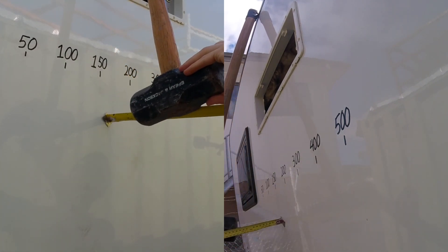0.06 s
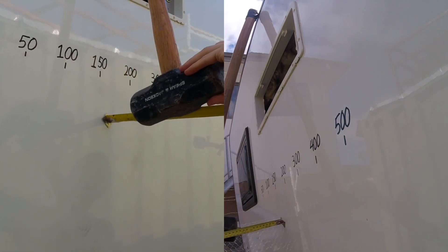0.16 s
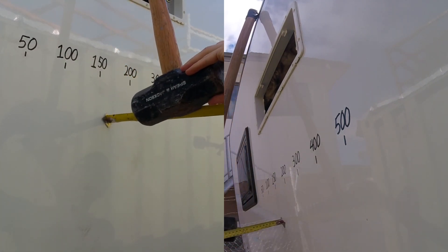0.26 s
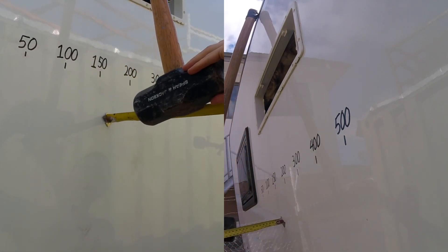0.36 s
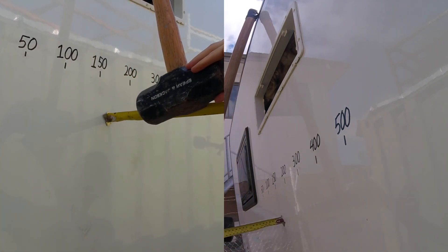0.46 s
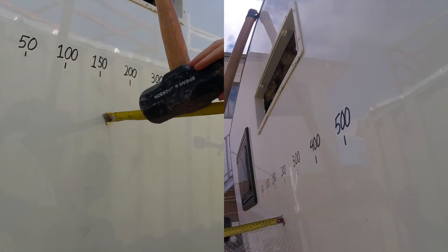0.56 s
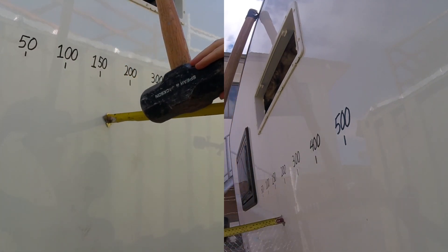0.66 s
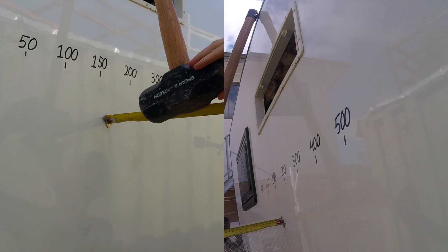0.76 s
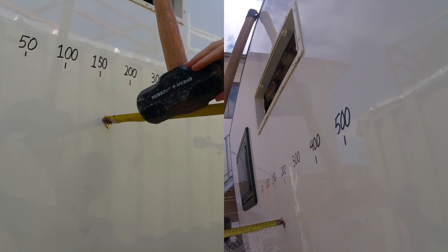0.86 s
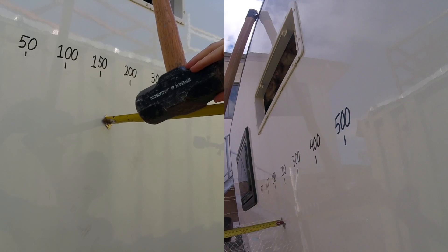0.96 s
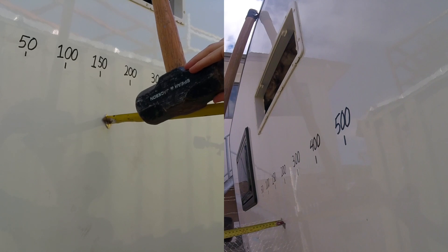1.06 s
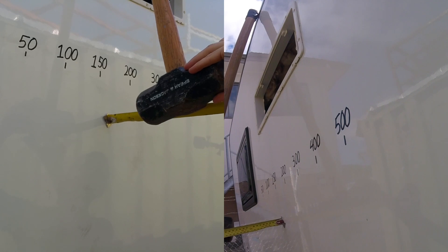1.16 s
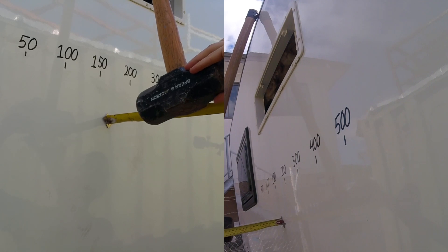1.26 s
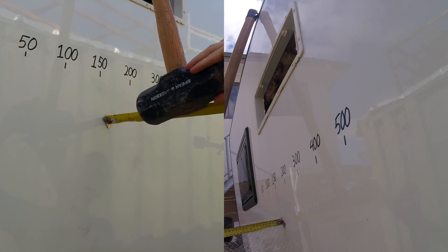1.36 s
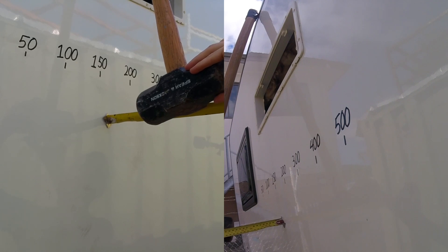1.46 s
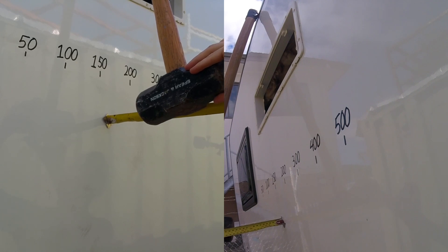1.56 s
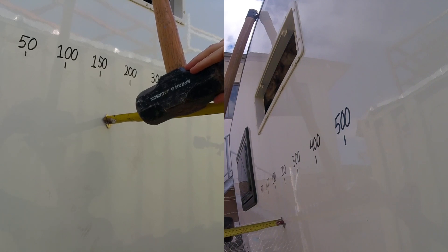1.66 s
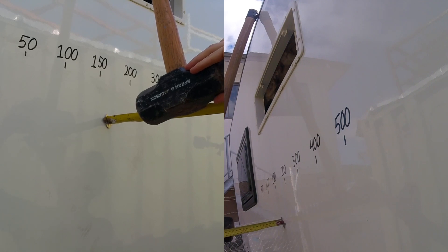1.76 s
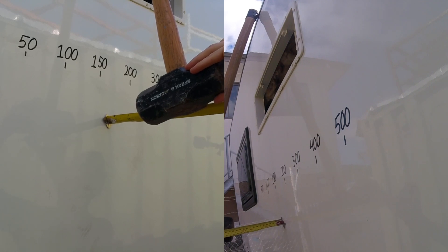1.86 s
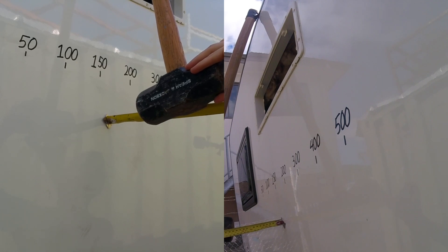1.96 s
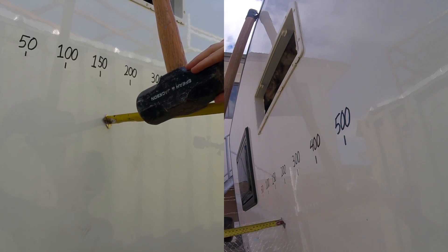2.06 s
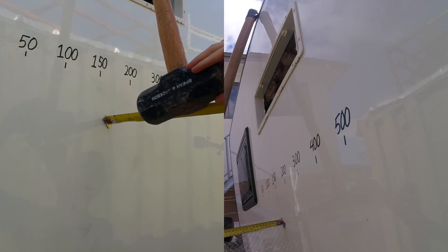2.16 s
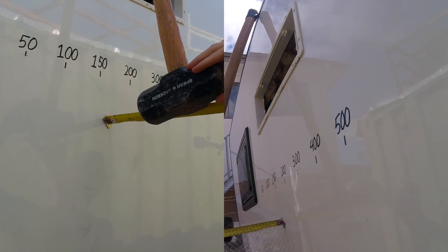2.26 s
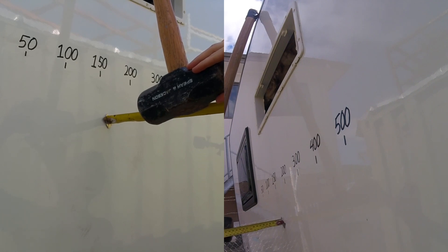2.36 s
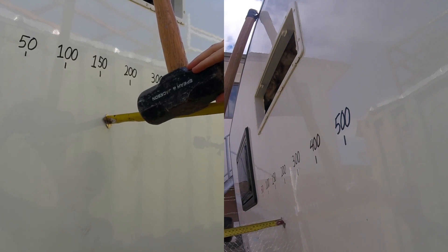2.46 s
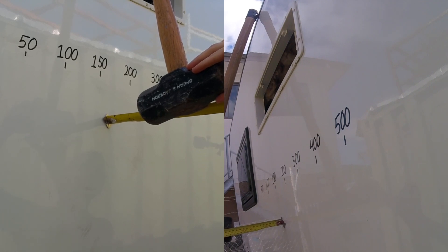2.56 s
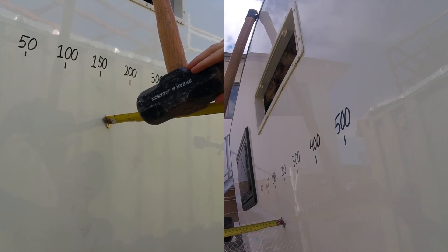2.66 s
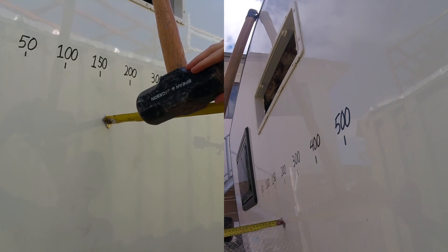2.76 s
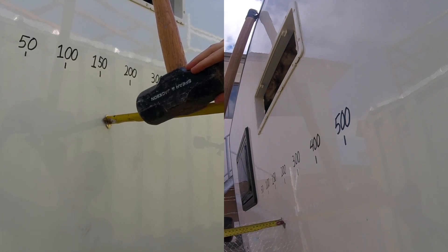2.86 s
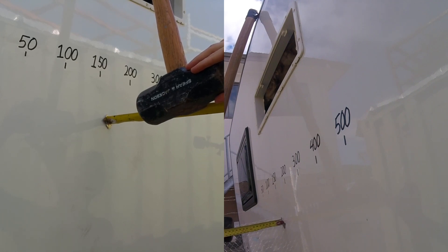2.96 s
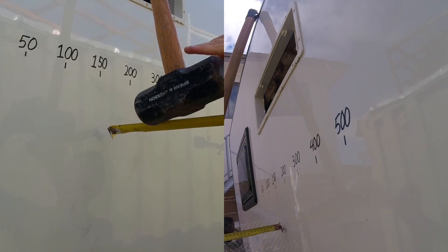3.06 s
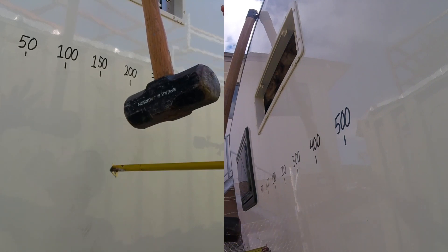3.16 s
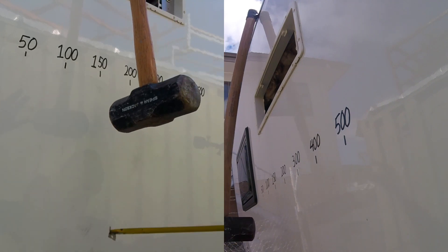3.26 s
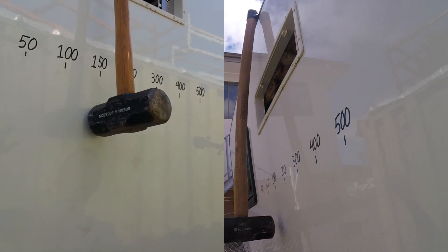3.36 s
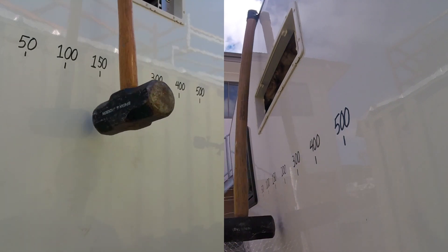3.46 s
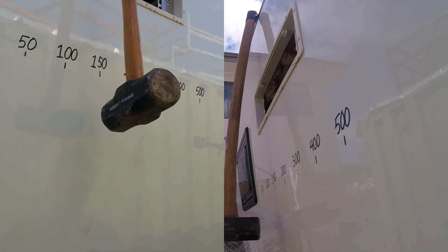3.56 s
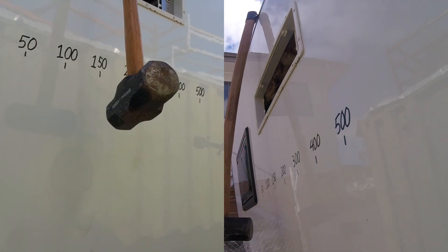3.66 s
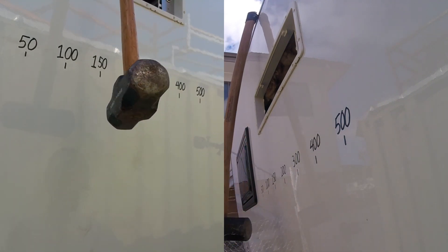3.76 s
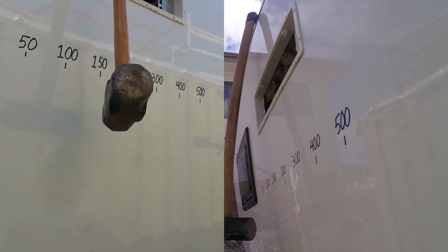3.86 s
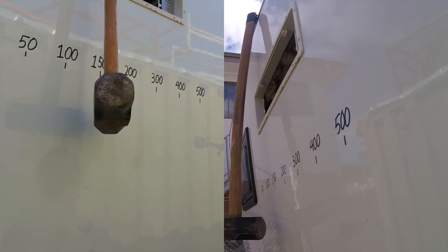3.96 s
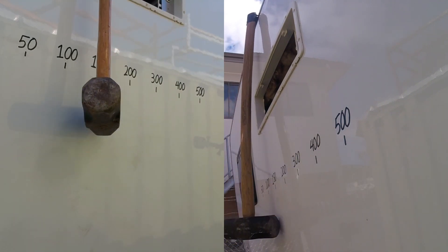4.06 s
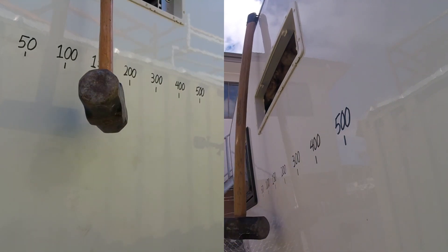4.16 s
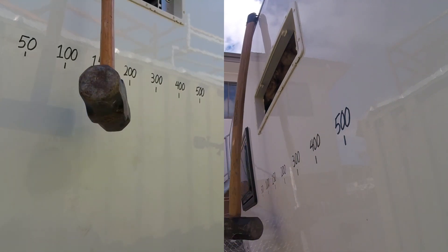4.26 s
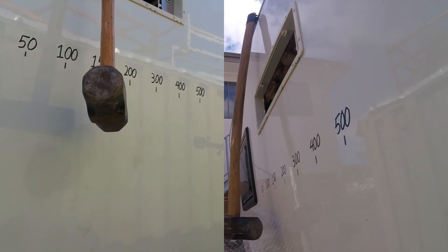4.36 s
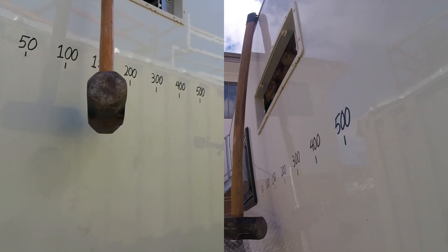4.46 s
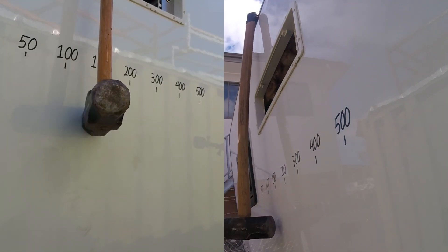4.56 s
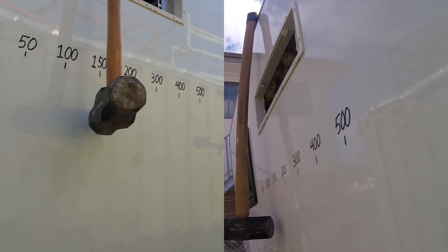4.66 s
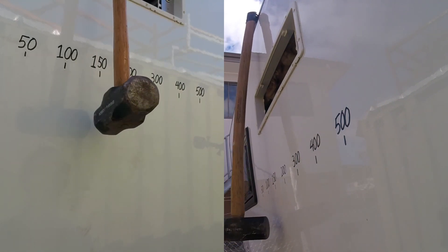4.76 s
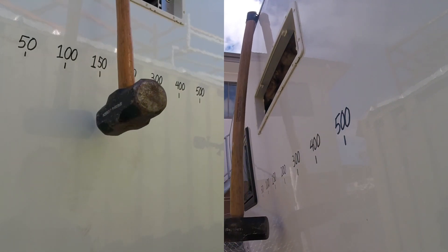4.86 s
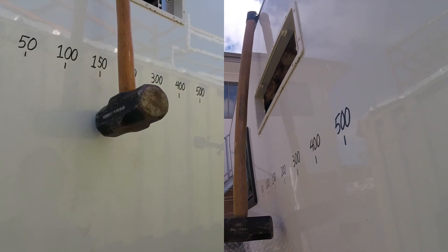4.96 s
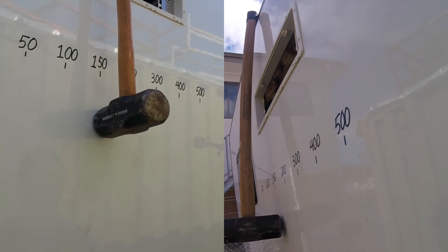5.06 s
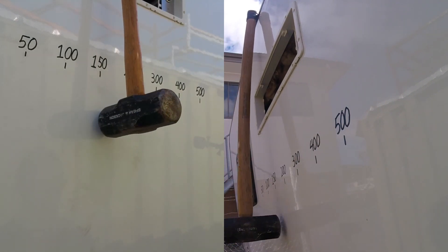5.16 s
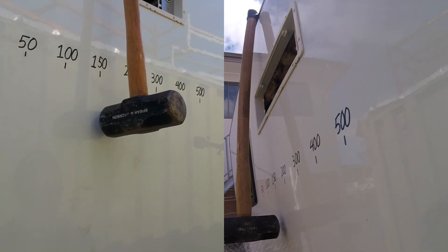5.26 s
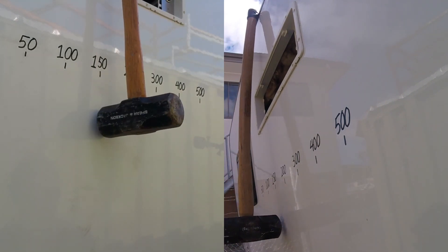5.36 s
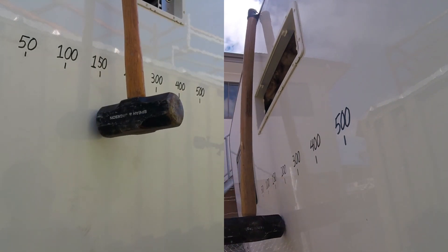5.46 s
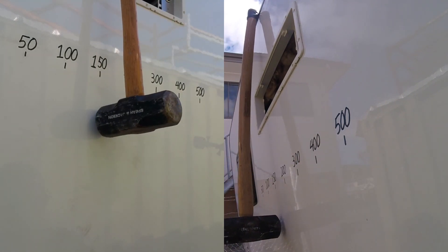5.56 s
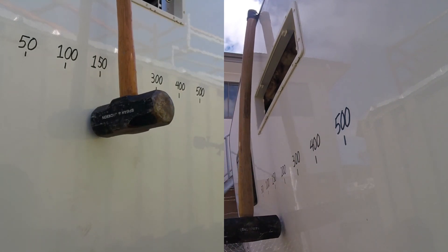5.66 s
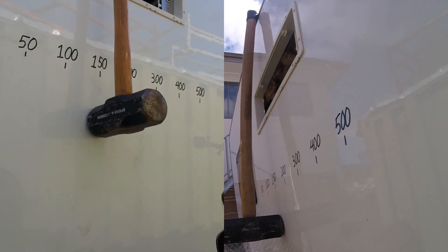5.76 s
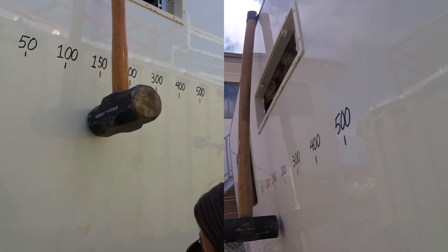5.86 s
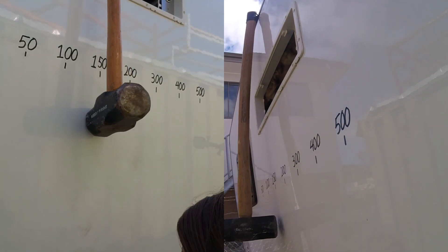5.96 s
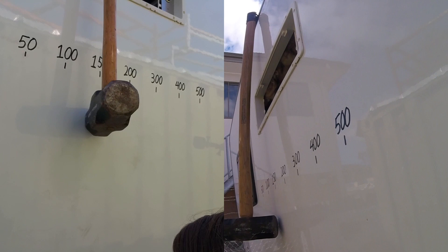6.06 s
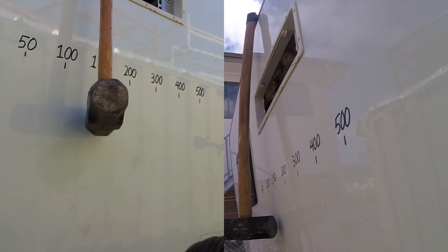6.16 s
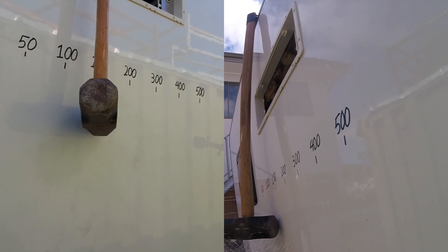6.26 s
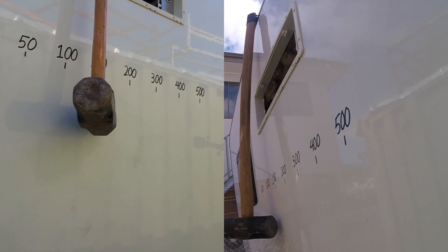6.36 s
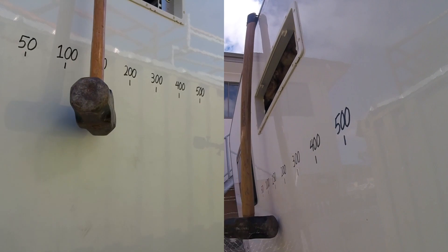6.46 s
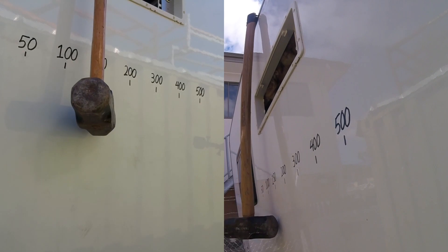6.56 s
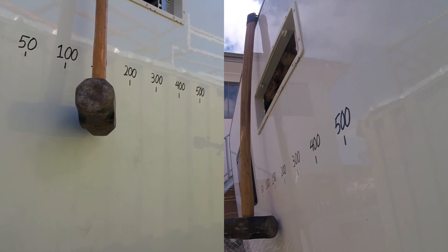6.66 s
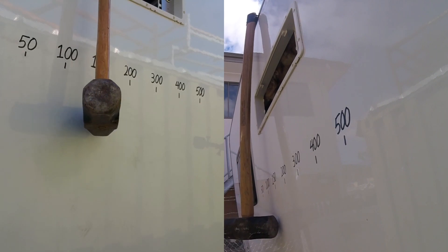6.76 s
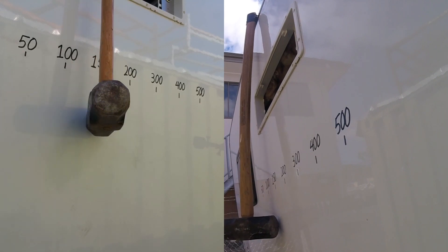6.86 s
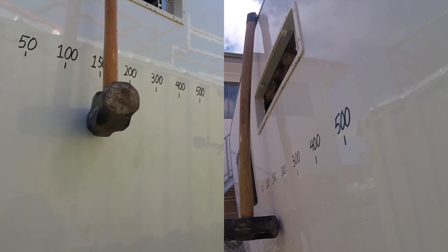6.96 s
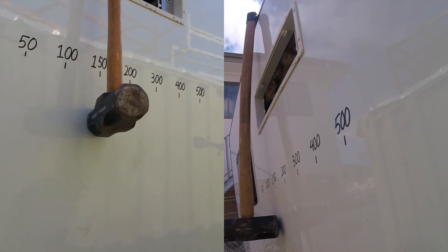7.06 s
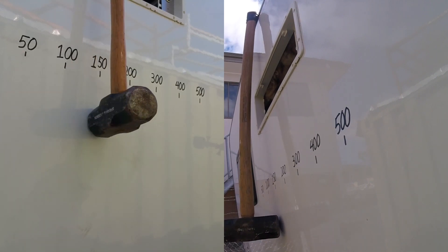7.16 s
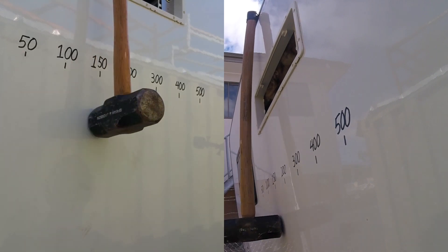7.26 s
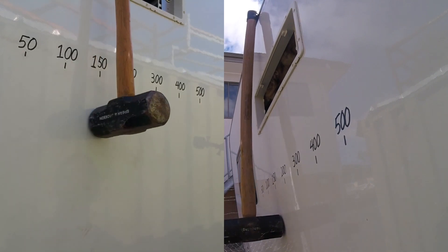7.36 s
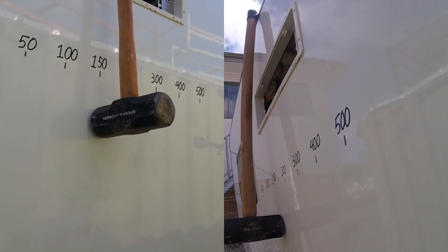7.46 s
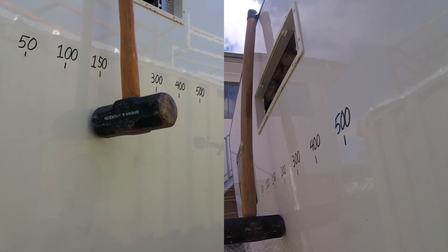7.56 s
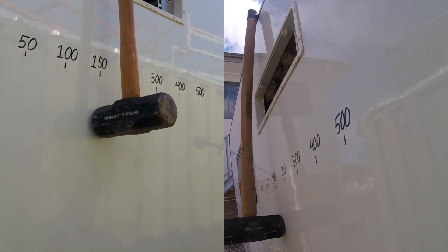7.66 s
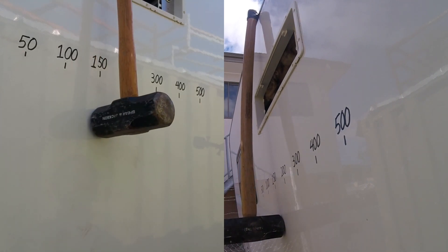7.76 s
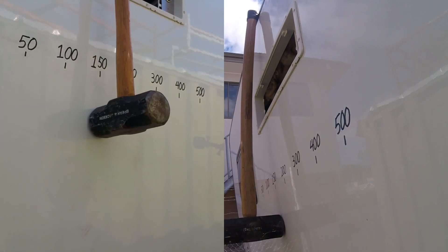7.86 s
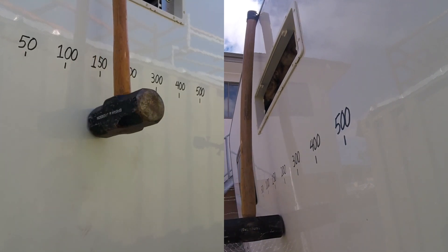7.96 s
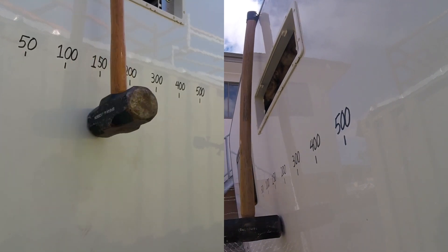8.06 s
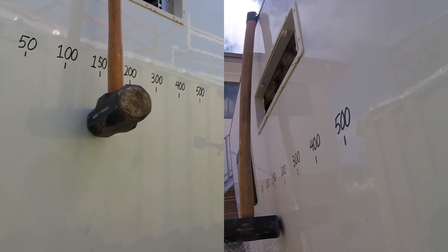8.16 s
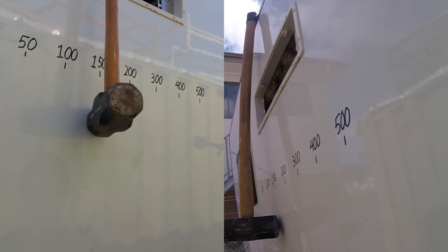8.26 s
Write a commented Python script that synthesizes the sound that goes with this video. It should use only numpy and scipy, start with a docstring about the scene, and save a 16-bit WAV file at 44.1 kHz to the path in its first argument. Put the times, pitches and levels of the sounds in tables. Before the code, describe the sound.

Outdoors, a quiet distant machine hum and soft rumble. After a few seconds a hanging sledgehammer slams a hollow fibreglass wall with a hard crack, deep boom and rattling fittings. It bounces back in duller knocks, ever closer together and mostly softer, ending in a tiny flutter. Close to the microphone, a metal tape measure squeaks faintly, clicks and scrapes back into its case.

```python
"""A hanging sledgehammer swings into a caravan's fibreglass wall and bounces, faster and broadly softer.
Each blow sums ringing bending modes with filtered noise for the shell; the first also drives the frame.
Close to the microphone, as of a tape measure being put away: thin squeaking tones, short ringing clicks,
and a rustle of noise grains over hiss.
In the distance outdoors a machine hums in wavering harmonics, over low rumble and a wash of air, both noise."""
import sys
import numpy as np
from scipy import signal
from scipy.fft import rfft, irfft
from scipy.io import wavfile

SR = 44100
rng = np.random.default_rng(int(sys.argv[2]) if len(sys.argv) > 2 else 0)


def materialize(psi):
    """Save the field psi as 16-bit PCM at rate SR to the path in sys.argv[1].

    A 1-D psi becomes a single channel; in a 2-D psi each row is a channel.
    """
    bounded = np.clip(np.atleast_2d(psi).T, -1, 1)
    quanta = np.round(bounded * 32767).astype(np.int16)
    wavfile.write(sys.argv[1], SR, quanta)


N = 366471
TIME = np.arange(N) / SR
RING = np.arange(int(0.7 * SR)) / SR  # time axis of one struck sound, s

# Levels in the tables are relative: each source sets its own gain. Spectra give shape only.
# Distant outdoors, wash of air and low rumble: f/Hz, level/dB per Hz
AIR_SPECTRUM = [(100, -18.5), (300, -1), (480, 1.5), (630, -2.5), (1000, -6), (1700, -13.5), (2400, -16.5),
                (3200, -23), (4000, -25), (5000, -33), (6300, -38.5), (9000, -57.5), (12500, -44.5),
                (15500, -48.5)]
RUMBLE_SPECTRUM = [(20, -53.5), (35, -31), (55, -7.5), (90, 5), (140, 7), (185, 2.5), (230, 5), (275, -5),
                   (330, 0), (420, -12.5), (550, -53)]
# Distant machine, harmonics of its hum: multiple of the fundamental, level/dB
HUM_HARMONICS = [(1, -38.5), (2, -50), (3, -62)]
HUM_HZ = 196.35  # mean fundamental
AIR_DB, RUMBLE_DB, BACKGROUND_DB = -46.5, -41.5, 0.4  # the last is added to the whole background
DIP_S, DIP_DB, DIP_FALL_S, DIP_RECOVER_S = 4.074, -4, 0.22, 1  # the background dips once, returns slowly

# Close by, short rubs of the blade as it is handled: start t/s, length t/s, scrape level/dB, hiss level/dB
BLADE_RUBS = [(0.072, 0.076, -58, -69), (.225, 0.064, -57, -76), (3.832, .045, -55, -73),
              (3.883, 0.076, -54, -68), (3.979, .1, -49, -74), (5.48, 0.1, -45.5, -78),
              (5.642, 0.09, -51, -75), (7.299, 0.03, -54, -64), (8.092, 0.076, -53.5, -71)]
# Close by, the blade runs back into its case: t/s, scrape level/dB, hiss level/dB
BLADE_RUN_IN = [(7.27, -63, -80), (7.304, -51, -74), (7.404, -40, -71.5), (7.57, -45.5, -67),
                (7.616, -39.5, -73), (7.63, -49, -66), (7.88, -56.5, -78)]
# Sliding blade, catching grains and smooth hiss: f/Hz, level/dB per Hz
SCRAPE_SPECTRUM = [(300, -17), (800, 7), (1350, 12.5), (2100, 4.5), (3200, 4.5), (4300, -4.5), (6200, -19),
                   (8000, -26), (16000, -29)]
HISS_SPECTRUM = [(2000, -15), (6000, 10), (9000, -9), (12500, 2.5), (15500, -2.5)]
RUN_SCRAPE_DB, RUN_HISS_DB = -3, 6  # added to the run's levels
RUN_EDGE_S = 0.05  # the run starts and stops gently
RUB_SKEW = 0.68  # each rub is one arch; under 1 it swells faster than it eases off
GRAINS_PER_S = 2600  # mean rate

# Close by, thin squeaks, each a little higher: start t/s, length t/s, mean pitch f/Hz, level/dB
SQUEAK_TONES = [(5.387, 0.1, 2206, -48), (5.481, 0.076, 2240, -49), (5.64, 0.069, 2255, -52.5)]
SQUEAK_EDGE_S = 0.022  # rise and fall

# Close by, light clicks of the tape case: t/s, level/dB, ring f/Hz
CASE_CLICKS = [(3.844, -49, 2620), (4.038, -42, 1500), (5.6862, -36, 2680), (5.690, -32, 1070),
               (5.7258, -27, 1300), (5.945, -43.5, 2780), (7.309, -40.5, 1480), (7.3525, -38.5, 2430),
               (7.386, -37, 1700), (7.394, -28, 1420), (7.4489, -32, 1380), (7.4863, -32, 1210),
               (7.5427, -35.5, 1180), (7.5881, -33.5, 1330), (7.6108, -29, 1400), (8.1047, -43, 2910)]
CLICK_EDGE_DB = -74  # the bright edge, alike for all clicks

# At the wall, loose fittings knock after the hardest blow: t/s, level/dB
FITTING_KNOCKS = [(3.525, -21), (3.5489, -17), (3.557, -20.5), (3.574, -21.5), (3.592, -28), (3.622, -27)]
# Loose fittings, colour of a knock: f/Hz, level/dB per Hz
KNOCK_SPECTRUM = [(60, -12), (170, 21), (250, 11), (350, 12), (520, 8.5), (720, 1), (1500, -9), (3000, -19),
                  (4200, -25), (5800, -29.5), (9000, -51), (12000, -43), (16000, -53)]

# Behind the skin, frame modes reached only by the hardest blow: f/Hz, level/dB, 60 dB decay t/s
FRAME_MODES = [(149, -10, 0.11), (181, -11.5, 0.2), (323.6, -13, 0.1)]

# Caravan shell, its crowd of higher modes: f/Hz, level/dB per Hz
SHELL_SPECTRUM = [(40, -20.5), (150, -10.5), (400, 7), (750, 6), (1000, 1), (1400, -3), (2200, -7),
                  (3200, -19), (4200, -25.5), (6000, -30.5), (9000, -53.5), (16000, -68)]
# Caravan shell, decay by band: f/Hz, 60 dB decay t/s
SHELL_DECAY = [(100, 0.97), (500, 0.36), (1500, 0.26), (3000, 0.26), (6000, 0.28), (12000, .19)]

# Hammer on the wall, one row a blow: t/s, strength level/dB, contact hardness/dB per octave
HAMMER_BLOWS = [(3.5179, 2.5, -1.2), (4.1749, -0.5, 0.5), (4.7078, -2.5, 1.5), (5.1895, -3, 1.5),
                (5.5528, -5.5, 0.5), (5.8691, -5.5, -2), (6.149, -10.5, -1.5), (6.3791, -11.5, 0.2),
                (6.5571, -12, -0.3), (6.698, -15, -1), (6.826, -16.5, -1.5), (6.944, -17.5, 0),
                (7.064, -16, -4), (7.192, -16.5, -8.5), (7.289, -19, -3), (7.383, -23, 2), (7.460, -24, 4),
                (7.531, -19.5, -11)]
# Wall skin at rest, bending modes in order: f/Hz, level/dB, 60 dB decay t/s
WALL_MODES = [(54.5, -37, 0.81), (74.6, -26.5, 0.63), (102.2, -12, 0.25), (121, -5, 0.12), (147, -10, 0.04),
              (167.8, -22, 0.41), (200.4, -16.5, 0.35), (234, -21.5, 0.24), (248.3, -16.5, 0.11),
              (303.5, -24, 0.27), (345, -26, 0.37), (371.2, -28, 0.22), (398, -28, 0.2), (414, -16, 0.049),
              (475, -45.5, 0.72), (496, -22, 0.27), (530, -27, 0.3), (536, -37, 0.38), (565, -21, 0.1),
              (621, -29.5, 0.3), (640, -32, 0.27), (677.4, -24.5, 0.17), (717, -26, 0.066),
              (792, -34.5, 0.21), (856, -24.5, 0.041), (959, -29, 0.13), (1014, -27.5, 0.055),
              (1087, -40, 0.27), (1200, -44.5, 0.16), (1387, -48.5, 0.27), (2010, -50.5, .22)]
# Tick of first contact (also the click edge), then sizzle of the gelcoat: f/Hz, level/dB per Hz
TICK_SPECTRUM = [(300, -22.5), (2000, 20), (4000, -52), (5600, 10), (7500, 3.5), (9500, -9), (12000, 3.5),
                 (16000, -15)]
SIZZLE_SPECTRUM = [(1000, -10.5), (3000, -2.5), (4300, -10), (5500, 2), (6400, -12), (7500, -18),
                   (9300, -29), (12500, -18), (16000, -27)]
# A dented skin rises in pitch: nearly the initial share at a 0 dB blow, and its growth with force
STRETCH, STRETCH_POWER = 0.0577, 4.66
TICK_DB, TICK_POWER = -50, 9.4  # the steel tick grows steeply: base level at a 0 dB blow, power of force
SIZZLE_DB, SIZZLE_FROM_DB = -37.5, -8.5  # the gelcoat sizzles with the force in excess of a threshold

EDGE_HZ = 15900  # upper band limit


def amp(db):
    """Decibels to gain."""
    return 10 ** (np.asarray(db) / 20)


def unit(x):
    """Scales to rms 1."""
    return x / np.sqrt(np.mean(x ** 2) + 1e-20)


def read(points, hz):
    """Reads a spectrum table on a log-frequency axis."""
    f, value = np.transpose(points)
    return np.interp(np.log(hz + 1), np.log(f + 1), value)


def add(mix, s, sound):
    """Mixes a sound in at time s, cut at the end of the mix."""
    part = mix[round(s * SR):][:len(sound)]
    part += sound[:len(part)]


def colour(x, points):
    """Filters x with a spectrum table, at rms 1."""
    gain = amp(read(points, np.fft.rfftfreq(len(x), 1 / SR)))
    return unit(irfft(rfft(x) * gain, len(x)))


def noise(points, size):
    """Coloured noise of rms 1."""
    return colour(rng.standard_normal(size), points)


def drift(hz):
    """Slow chance of rms 1, mostly below hz changes a second."""
    lowpass = 1 + (np.fft.rfftfreq(N, 1 / SR) / hz) ** 4
    return unit(irfft(rfft(rng.standard_normal(N)) / lowpass, N))


def fade(t60):
    """A decay of 60 dB in t60 seconds."""
    return amp(-60 * RING / np.maximum(t60, 1e-4))


def swell(rise_s):
    """A soft start."""
    return 1 - np.exp(-(RING / rise_s) ** 2)


def gate(start, end, edge_s):
    """Rises, holds and falls between two times."""
    return np.clip(np.minimum(TIME - start, end - TIME) / edge_s, 0, 1)


def outdoors():
    """A distant machine's hum wavers in pitch and level over low rumble and a wash of air."""
    turns = np.cumsum(HUM_HZ * (1 + 0.0027 * drift(11.0))) / SR
    hum = np.zeros(N)
    for multiple, db in HUM_HARMONICS:
        tone = np.sqrt(2) * np.sin(2 * np.pi * round(multiple) * turns)
        hum += amp(db + 1.27 * drift(2.9)) * tone
    rumble = amp(RUMBLE_DB + 1.0 * drift(5.5)) * noise(RUMBLE_SPECTRUM, N)
    air = amp(AIR_DB + 0.19 * drift(7.5)) * noise(AIR_SPECTRUM, N)
    dip = np.interp(TIME, [DIP_S - DIP_FALL_S, DIP_S, DIP_S + DIP_RECOVER_S], [0, 1, 0])
    return amp(BACKGROUND_DB + DIP_DB * dip) * (hum + rumble + air)


def tape():
    """The sliding blade catches in tiny clumped grains over a smooth hiss: short rubs and one long run."""
    s, run_scrape_db, run_hiss_db = np.transpose(BLADE_RUN_IN)
    running = gate(s[0], s[-1], RUN_EDGE_S)
    scrape_level = running * amp(RUN_SCRAPE_DB + np.interp(TIME, s, run_scrape_db))
    hiss_level = running * amp(RUN_HISS_DB + np.interp(TIME, s, run_hiss_db))
    for start, length, scrape_db, hiss_db in BLADE_RUBS:
        stroke = np.sin(np.pi * np.minimum(RING / length, 1) ** RUB_SKEW)
        add(scrape_level, start, amp(scrape_db) * stroke)
        add(hiss_level, start, amp(hiss_db) * stroke)
    catches = rng.random(N) < GRAINS_PER_S / SR
    grains = catches * rng.standard_normal(N) * amp(2 * np.minimum(rng.exponential(1, N), 4))
    scrape = colour(grains * amp(1.7 * drift(90)), SCRAPE_SPECTRUM)  # drift clumps the grains
    hiss = amp(1.2 * drift(60)) * noise(HISS_SPECTRUM, N)
    return scrape_level * scrape + hiss_level * hiss


def squeak():
    """Nearly pure tones that falter in pitch and level as they go."""
    out = np.zeros(N)
    clock = np.cumsum(1 + 0.0032 * drift(70)) / SR
    for s, length, hz, db in SQUEAK_TONES:
        tone = np.sqrt(2) * np.sin(2 * np.pi * hz * clock)
        out += amp(db) * gate(s, s + length, SQUEAK_EDGE_S) * tone
    return out * amp(1.5 * drift(50))


def clicks():
    """Each click is two short plastic resonances, a bright edge and a short scatter off the wall."""
    out = np.zeros(N)
    for s, db, hz in CASE_CLICKS:
        high = np.sin(2 * np.pi * hz * RING) * fade(0.0078)
        low = np.sin(2 * np.pi * 0.59 * hz * RING) * fade(0.028)
        ring = high - amp(-13.5) * low
        around_ring = [(hz / 4, -24), (hz * 0.65, -4), (hz, 0), (hz * 1.6, -9), (hz * 3.5, -30), (hz * 8, -60)]
        scatter = noise(around_ring, len(RING)) * fade(0.077)
        edge = amp(CLICK_EDGE_DB) * noise(TICK_SPECTRUM, len(RING)) * fade(0.06)
        click = amp(db) * (amp(13.0) * ring + amp(-7.5) * scatter) + edge
        add(out, s, click * swell(0.00082))
    return out


def fittings():
    """Loose trim on the shaken wall knocks in short bursts of coloured noise."""
    out = np.zeros(N)
    for s, db in FITTING_KNOCKS:
        knock = noise(KNOCK_SPECTRUM, len(RING)) * fade(0.14) * swell(0.00081)
        add(out, s, amp(db + 2.5) * knock)
    return out


def frame():
    """The first blow dents the skin deep enough to drive the studs behind it, which ring in a few modes."""
    out = np.zeros(N)
    ring = np.zeros(len(RING))
    for k, (hz, db, t60) in enumerate(FRAME_MODES):
        ring += (-1) ** k * amp(db) * fade(t60) * np.sin(2 * np.pi * hz * RING)
    add(out, 3.5225, ring * swell(0.0014))
    return out


def slap(delay_s):
    """A short reflection of the blow's crack off the ground, as a delayed noise burst."""
    burst = noise(SHELL_SPECTRUM, len(RING)) * fade(0.025) * swell(0.00053)
    return np.interp(RING - delay_s, RING, burst, left=0)


def shell(rise_s):
    """Dense modes build up as the wave spreads, and each band dies at its own speed."""
    hz, t, bands = signal.stft(noise(SHELL_SPECTRUM, len(RING)), SR, nperseg=256)
    bands = bands * amp(-60 * t / read(SHELL_DECAY, hz)[:, None])
    bands = bands * amp(1.8 * rng.standard_normal(len(t)))  # the shaken shell rattles unevenly
    ringing = signal.istft(bands, SR, nperseg=256)[1][:len(RING)]
    return ringing * (1 - np.exp(-RING / rise_s))


def contact(x, hardness_db, corner_hz):
    """A softer, longer contact tilts the treble down, without ringing ahead of the blow."""
    size = 65536
    hz = abs(np.fft.fftfreq(size, 1 / SR))
    log_gain = np.log(amp(hardness_db * np.log2(np.hypot(1, hz / corner_hz))))
    minimum_phase = np.exp(np.conj(signal.hilbert(log_gain)))
    return np.fft.ifft(np.fft.fft(x, size) * minimum_phase).real[:len(x)]


def hammer():
    """Blows on one spot: neighbouring modes push the air in opposite senses, so the boom swells late."""
    modes = [((-1) ** k * amp(db) * fade(t60), hz) for k, (hz, db, t60) in enumerate(WALL_MODES)]
    out = np.zeros(N)
    for s, strength_db, hardness_db in HAMMER_BLOWS:
        force = amp(strength_db)
        stretch = STRETCH * force ** STRETCH_POWER
        tick = amp(TICK_DB) * force ** TICK_POWER
        sizzle = amp(SIZZLE_DB) * max(force - amp(SIZZLE_FROM_DB), 0)
        # the dented skin is tauter until it springs back
        clock = RING + stretch * 0.0217 * (1 - np.exp(-RING / 0.022))
        panel = sum(level * np.sin(2 * np.pi * hz * clock) for level, hz in modes)
        body = panel + amp(-26.5) * shell(rise_s=0.0051) + amp(-21.5) * slap(delay_s=0.007)
        add(out, s, force * contact(body, hardness_db, corner_hz=298))
        add(out, s, tick * amp(4.5) * noise(TICK_SPECTRUM, len(RING)) * fade(0.014))
        # the steel face chatters once
        add(out, s + 0.0029, tick * amp(-2.0) * noise(SIZZLE_SPECTRUM, len(RING)) * fade(0.0071))
        add(out, s, sizzle * noise(SIZZLE_SPECTRUM, len(RING)) * fade(0.14))
    return out


def scene():
    """All sources, distant to close, at one microphone."""
    background = outdoors()
    close_by = tape() + squeak() + clicks()
    wall = fittings() + frame() + hammer()
    return (background + close_by + wall)[None]


def record(dry):
    """The microphone rounds the very highest peaks; then the band limit."""
    rounded = 1.6 * np.tanh(dry / 1.6)
    lowpass = signal.firwin(301, EDGE_HZ, window=("kaiser", 8), fs=SR)
    return signal.oaconvolve(rounded, lowpass[None], "same")


dry = scene()
out = record(dry)
materialize(out)
```